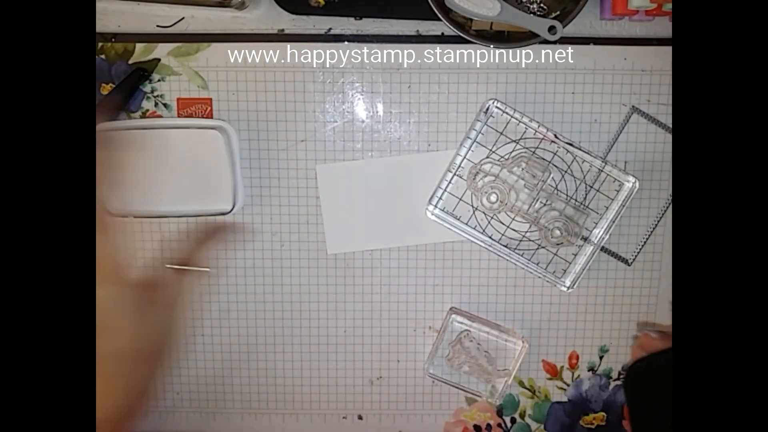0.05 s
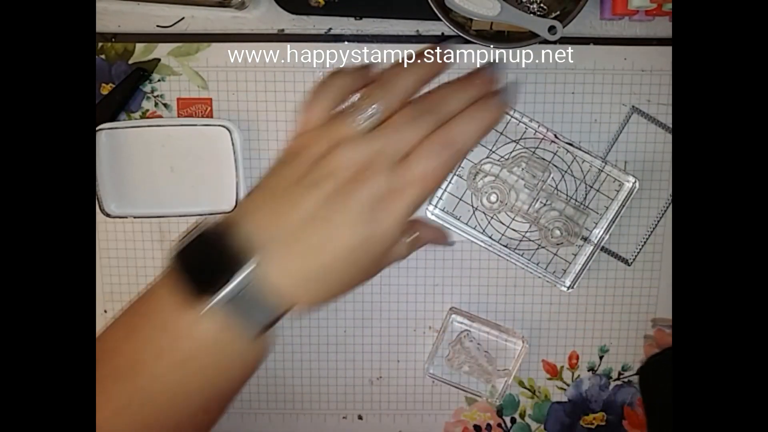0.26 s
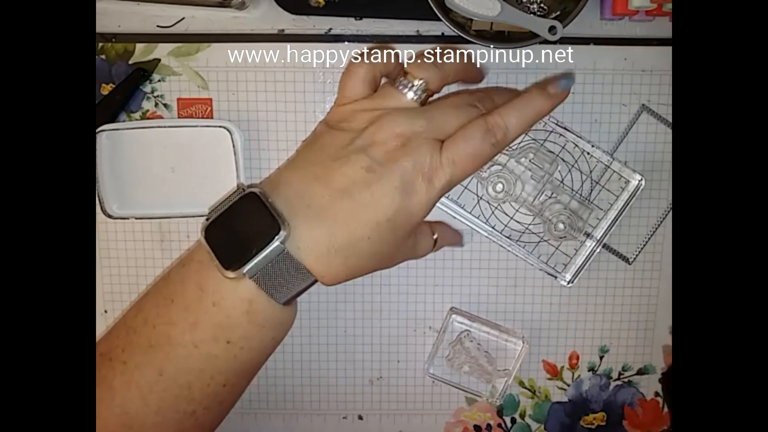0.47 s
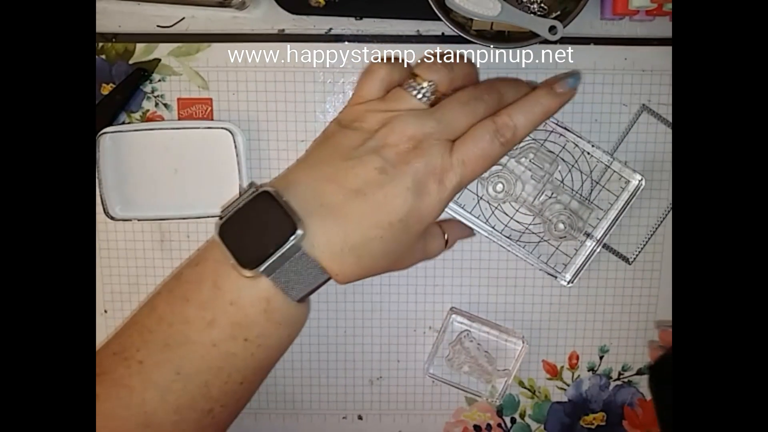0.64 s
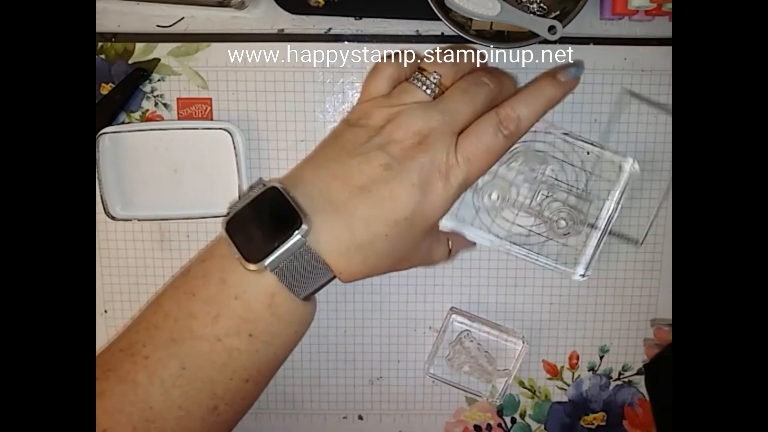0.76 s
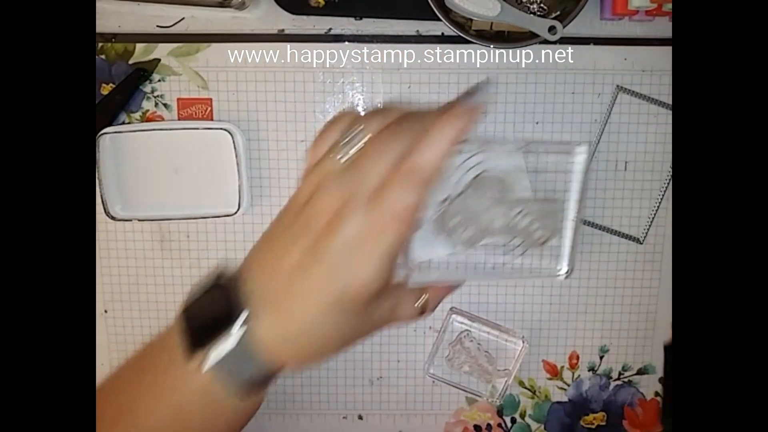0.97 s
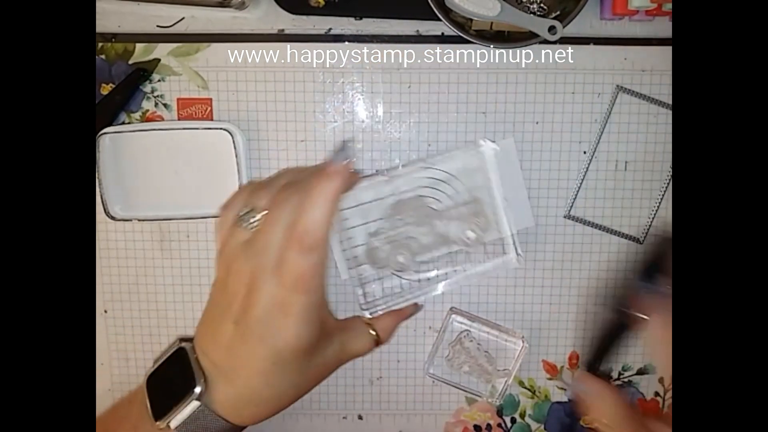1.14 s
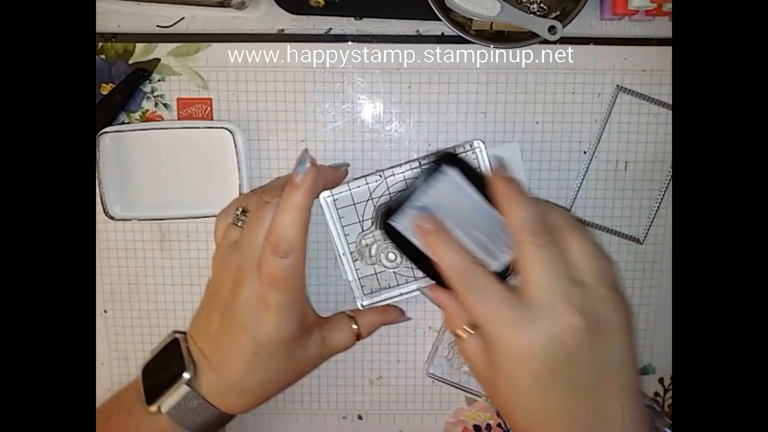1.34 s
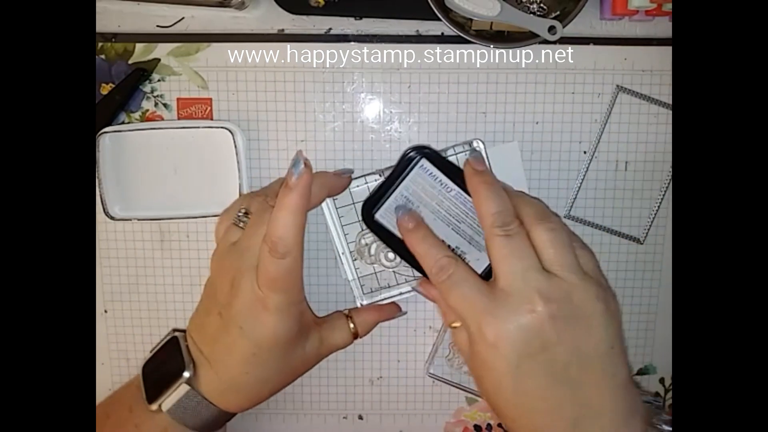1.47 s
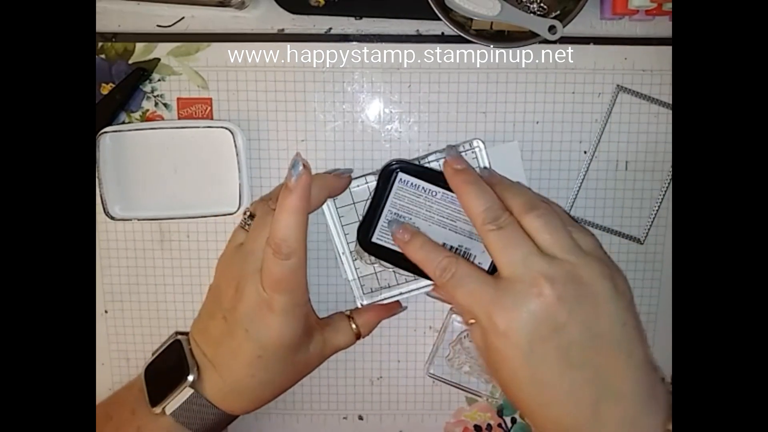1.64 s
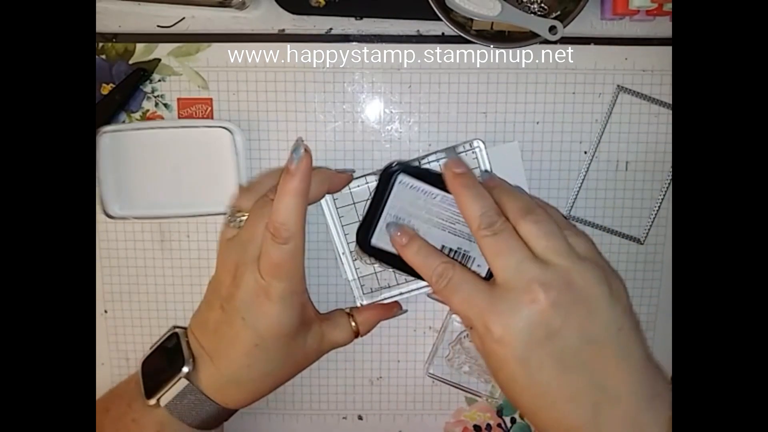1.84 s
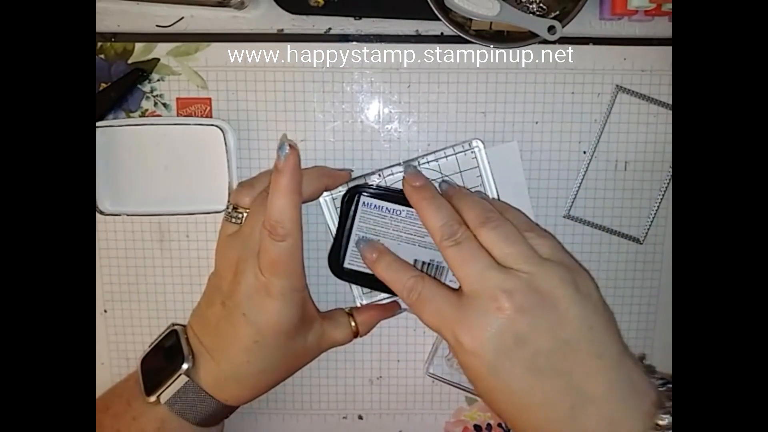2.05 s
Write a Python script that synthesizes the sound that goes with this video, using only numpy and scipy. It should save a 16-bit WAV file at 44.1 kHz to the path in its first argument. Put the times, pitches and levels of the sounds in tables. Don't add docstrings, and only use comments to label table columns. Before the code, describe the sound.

A hollow plastic ink pad case rattles sharply, a finger ring clinks on acrylic, a block peels stickily and thuds onto the table, then tiny tacky dabs; small room, close overhead phone microphone.

```python
import sys
import numpy as np
from scipy import signal
from scipy.io import wavfile
from scipy.ndimage import uniform_filter1d

SR = 44100
rng = np.random.default_rng(int(sys.argv[2]) if len(sys.argv) > 2 else 0)


def persist_wave(psi):
    counts = np.round(np.clip(psi, -1, 1) * 32767).astype(np.int16)
    wavfile.write(sys.argv[1], SR, np.atleast_2d(counts).T)


def attenuation_scalar(level_db):
    decades = np.asarray(level_db, float) / 20
    return 10 ** decades


N = 92610


def rms_one(x):
    return x / np.sqrt(np.mean(x ** 2) + 1e-20)


def at_hz(points, hz):
    table_hz, values = np.transpose(points)
    return np.interp(np.log(hz), np.log(table_hz), values)


def drift(rate_hz):
    steps = rng.standard_normal(200)
    return np.interp(np.arange(N) / SR * rate_hz, np.arange(len(steps)), steps)


def lowpass(x, order, hz):
    return signal.sosfilt(signal.butter(order, hz, fs=SR, output="sos"), x)


def highpass(x, order, hz):
    return signal.sosfilt(signal.butter(order, hz, "high", fs=SR, output="sos"), x)


def resonate(x, hz, width_hz):
    r = np.exp(-np.pi * width_hz / SR)
    top = np.array([1, 0, -1]) * (1 - r * r) / 2
    return signal.lfilter(top, [1, -2 * r * np.cos(2 * np.pi * hz / SR), r * r], x + 1e-18)


def clicks(s, db):
    out = np.zeros(N) + 1e-18
    out[(np.array(s) * SR).astype(int)] = attenuation_scalar(db)
    return out


def fade(x, decay_s):
    return signal.lfilter([1], [1, -np.exp(-1 / (decay_s * SR))], x)


def puffs(s, db, decay_s):
    return fade(clicks(s, db), decay_s) * rng.standard_normal(N)


def strike(s, db, modes, contact_s, damp=1, turn=1):
    out = np.zeros(N)
    chance_db = 2.5 * rng.standard_normal((len(s), len(modes)))
    if contact_s:
        chatter = rng.standard_normal(N) / np.sqrt(contact_s * SR / 2 + 1)
    for k, (hz, level_db, t60) in enumerate(modes):
        push = clicks(s, db + level_db + chance_db[:, k])
        if contact_s:
            push = push + chatter * fade(push, contact_s)
        r, w = attenuation_scalar(-60 / (t60 * damp * SR)), 2 * np.pi * hz / SR
        out += turn ** k * signal.lfilter([0, np.sin(w)], [1, -2 * r * np.cos(w), r * r], push)
    return out


# (time [s], peak level [dB], hollow knock against the click [dB])
CASE_HITS = [(.008, -43.5, 7), (0.0555, -37.5, -2), (0.0603, -43.5, -4), (0.0711, -50, -3),
             (0.0867, -27.5, -5), (0.11, -41, 0.5), (0.126, -43, -9.5), (.1388, -9, -28),
             (.1396, -8.5, -28.5), (0.1454, -16.5, -4.5), (0.1466, -9.5, -11.5), (.149, -16.5, -17.5),
             (0.1512, -23.5, -16.5), (0.155, -24, -15), (0.158, -19, -19), (0.1603, -21, -19),
             (0.173, -33, -14.5), (.181, -27.5, -12.5), (.189, -29, -15), (0.197, -33.5, -7),
             (.213, -34, 3), (0.2349, -27, -8), (0.2534, -24, -6.5), (.2634, -22, -22), (.275, -39, -4.5),
             (0.31, -46, 3), (.328, -54, 8), (0.389, -45, -1)]
# (pitch [Hz], level [dB], time to fall 60 dB [s])
CASE_MODES = [(1775, -4.5, .012), (1980, -11, 0.011), (2369, -3, .018), (2580, -1, 0.018), (2729, 0, .022),
              (3010, -3.5, 0.02), (3860, 3, 0.014), (3998, -2, 0.017), (4650, -3.5, 0.015),
              (5020, -4, 0.013), (5310, -1, 0.0068), (6400, -14.5, 0.0058), (10860, -22.5, .008),
              (14000, -27, .003)]
# (pitch [Hz], level [dB], time to fall 60 dB [s])
KNOCK_MODES = [(321, -12, 0.011), (515, 1, .022), (946, 1.5, 0.011), (1285, -7, 0.0098)]


def case():
    s, db, knock_db = np.transpose(CASE_HITS)
    crack = resonate(puffs(s, db - 6, decay_s=.0025), hz=3600, width_hz=3500)
    crack = lowpass(crack, order=4, hz=6300)
    shell = strike(s, db - 13, CASE_MODES, contact_s=0.0004, turn=-1.011)
    knock = strike(s, db + knock_db - 9, KNOCK_MODES, contact_s=0.0037)
    return highpass(shell + crack + knock, order=2, hz=280)


# (time [s], level [dB])
SETDOWN = [
    (1.2595, -16.5),
    (1.2756, -35.5),
]
# (pitch [Hz], level [dB], time to fall 60 dB [s])
BLOCK_MODES = [(348, -4.5, 0.013), (593, -3.5, 0.021), (875, -11, 0.019), (1120, -4, .01), (1370, 1, 0.012),
               (1770, -4, 0.017), (2640, -11, 0.0073), (2970, -8.5, 0.011), (5240, -11.5, 0.013)]
# (pitch [Hz], level [dB], time to fall 60 dB [s])
TABLE_MODES = [(95.4, -27.5, 0.22), (128.5, -23.5, 0.39), (186.2, -12.5, 0.3), (230.1, 1, 0.15),
               (344.3, 3, 0.062), (427, -15.5, 0.086), (509, -9.5, 0.044)]


def setdown():
    s, db = np.transpose(SETDOWN)
    crack = resonate(puffs(s, db - 8.5, decay_s=.005), hz=3200, width_hz=3500)
    crack = lowpass(resonate(crack, hz=3800, width_hz=5500), order=3, hz=6400)
    boom = strike(s - .0002, db - 8.5, TABLE_MODES, contact_s=0)
    boom = signal.sosfilt(signal.butter(2, [100, 900], "band", fs=SR, output="sos"), boom)
    clack = lowpass(strike(s, db - 4.5, BLOCK_MODES, contact_s=0), order=3, hz=4500)
    return clack + crack + boom


# (time [s], peak level [dB])
CLINKS = [
    (0.4386, -25.5),
    (0.5657, -48.5),
]
# (pitch [Hz], level [dB], time to fall 60 dB [s])
RING_MODES = [(8600, -24, 0.15), (8540, -26, 0.099), (9150, -11.5, 0.063), (9730, -10, 0.042),
              (10320, 0.5, 0.056), (10270, -6, 0.046), (10520, -17, 0.055), (12380, -12, .06),
              (12700, -14, .06), (14430, -10.5, 0.082), (15220, -17, .1), (15400, -17, 0.11)]
# (pitch [Hz], level [dB], time to fall 60 dB [s])
ACRYLIC_MODES = [(1400, -2, 0.0045), (1840, 0, 0.019), (3280, -7, 0.0099), (4060, -5.5, 0.011),
                 (4690, -0.5, 0.0066), (5060, 0, 0.0048), (6220, -16.5, 0.016)]


def clink():
    s, db = np.transpose(CLINKS)
    crack = resonate(puffs(s, db - 3.5, decay_s=0.0028), hz=4200, width_hz=4200)
    metal = strike(s, db - 13, RING_MODES, contact_s=0.00012)
    acrylic = strike(s[:1], db[:1] - 5, ACRYLIC_MODES, contact_s=0.00058, turn=-1.09)
    return highpass(metal + acrylic + crack, order=2, hz=1300)


# (start [s], rise [s], hold [s], level [dB], deep part against the bright [dB])
PEELS = [(.868, .003, 0.0056, -56, 0), (.879, .001, 0.0034, -48.5, -8), (.885, 0.0025, 0.0041, -46.5, -12),
         (.891, .001, 0.0026, -49.5, -6), (0.897, 0.0028, .004, -40.5, 3), (.907, 0.0011, 0.0021, -43, 4),
         (0.91, 0.00075, 0.0028, -45.5, -2), (0.913, 0.00091, 0.0012, -44.5, 6),
         (0.9174, 0.00058, 0.0014, -41, 1), (.921, .001, 0.0035, -42, 1), (0.926, .002, 0.0084, -55.5, 3),
         (0.94, .002, 0.0052, -62, -4), (1.016, 0.0016, .002, -55, 2.5),
         (1.025, 0.0026, 0.0038, -54.5, -0.5)]
# (pitch [Hz], width [Hz], level [dB])
EDGE = [(336, 180, -14), (1160, 270, -23), (3230, 540, -3.5), (3510, 550, -4.5), (4320, 690, 6),
        (4900, 480, 4.5), (5630, 780, -1), (6660, 480, -16)]


def peel():
    slips_per_s, rough_db, fall_s = 5000, 3.0, .0015
    t = np.arange(N) / SR
    start, rise, hold, db, deep_db = np.array(PEELS).T[:, :, None]
    swell = np.clip((t - start) / rise, 0, 1)
    shape = swell * np.exp(-np.maximum(t - start - rise - hold, 0) / fall_s)
    strength = attenuation_scalar(rough_db * np.minimum(rng.exponential(1, N), 4))
    slips = (rng.random(N) < slips_per_s / SR) * strength * rng.choice([-1, 1], N)
    rings = []
    for k, (hz, width_hz, level_db) in enumerate(EDGE):
        ringing = resonate(resonate(slips, hz, width_hz), hz, 2 * width_hz)
        rings.append(attenuation_scalar(level_db) * (-1) ** k * ringing)
    deep, bright = rms_one(sum(rings[:4])), rms_one(sum(rings[4:]))
    bright = bright + attenuation_scalar(-21.5) * rng.standard_normal(N)
    bright_level = np.sum(attenuation_scalar(db) * shape, axis=0)
    deep_level = np.sum(attenuation_scalar(db + deep_db - 4) * shape, axis=0)
    return bright_level * bright + deep_level * deep


# (time [s], peak level [dB], pitch [Hz], length [s])
TICKS = [(0.6774, -48.5, 5130, 0.00095), (0.8271, -44, 5670, 0.0014), (.828, -50, 950, .003),
         (0.869, -50, 1400, 0.0043), (1.135, -59, 3300, 0.0055), (1.2366, -36.5, 3780, 0.0036),
         (1.2563, -48, 9000, .0008), (1.2588, -45.5, 8900, .0015), (1.4144, -53, 2280, 0.0044),
         (1.416, -52, 4110, 0.0045), (1.578, -56, 3560, 0.0056), (1.731, -49, 3600, 0.0025),
         (1.7842, -42.5, 5060, 0.0019), (1.8896, -40, 5420, 0.0019), (1.896, -43.5, 5950, 0.0021),
         (2.0219, -36.5, 5200, 0.0013), (2.028, -54.5, 4900, 0.0027)]


def ticks():
    out, t = np.zeros(N + SR), np.arange(SR // 20) / SR
    for s, db, hz, length in TICKS:
        noise = rng.standard_normal(len(t))
        pitched = rms_one(resonate(resonate(noise, hz, hz / 2.5), hz, hz))
        snap = pitched + attenuation_scalar(-6.5) * noise
        start = int(s * SR)
        out[start:start + len(t)] += attenuation_scalar(db - 5.5) * snap * np.exp(-t / max(length, 3e-4))
    return out[:N]


# (time [s],
# length [s], pitch [Hz], level [dB])
SQUEAKS = [
    (.474, .008, 1850, -55.5),
    (.479, .01, 4000, -49.5),
    (.564, 0.01, 1860, -55),
    (.565, .007, 3510, -55),
    (0.562, 0.0083, 5900, -53.5),
    (1.012, 0.0064, 4460, -45),
    (1.02, 0.0046, 3480, -48),
    (1.026, 0.013, 3570, -50),
    (1.027, 0.0086, 4460, -55),
    (1.411, 0.012, 2380, -52.5),
]


def squeaks():
    t, out = np.arange(N) / SR, np.zeros(N)
    warped_t = np.cumsum(1 + 0.0086 * drift(rate_hz=79)) / SR
    for s, length, hz, db in SQUEAKS:
        progress = np.clip((t - s) / length, 0, 1)
        swell = np.sin(np.pi * np.sqrt(progress)) ** 2
        out = out + attenuation_scalar(db) * swell * np.sin(2 * np.pi * hz * warped_t)
    return out


# (time [s], peak level [dB])
THUMPS = [(0.189, -47), (0.239, -35), (0.438, -44.5), (0.48, -41.5), (0.562, -40.5), (0.599, -50),
          (.775, -49.5), (0.826, -47), (0.871, -41.5), (0.904, -43.5), (0.941, -42), (1.011, -50),
          (1.057, -52), (1.131, -46.5), (1.411, -44.5), (1.569, -36.5), (1.58, -36.5), (1.892, -46),
          (1.954, -44.5), (2.022, -59)]


def thumps():
    s, db = np.transpose(THUMPS)
    return lowpass(strike(s, db - 7.5, TABLE_MODES, contact_s=0, damp=0.37), order=2, hz=229)


# (time [s], level [dB])
BRUSH = [(0, -100), (1.499, -80.5), (1.57, -78), (1.599, -80), (1.66, -70.5), (1.72, -77.5), (1.82, -76),
         (1.869, -81.5), (1.959, -74.5), (2.05, -77.5), (2.1, -85)]


def brush():
    s, db = np.transpose(BRUSH)
    noise = rng.standard_normal(N)
    crisp = resonate(resonate(noise, hz=4300, width_hz=2500), hz=4300, width_hz=4000)
    rustle = crisp + .7 * resonate(noise, hz=1700, width_hz=600)
    level_db = np.interp(np.arange(N) / SR, s, db) + 2.0 * drift(rate_hz=76)
    return attenuation_scalar(level_db) * rms_one(rustle)


# (pitch [Hz], level [dB], time to fall 60 dB [s])
DISH_MODES = [(216, -48, 0.51), (423, -51.5, 0.9), (899, -60, 0.13), (1555, -43, 0.14), (1555, -54.5, 0.63),
              (1630, -53, 0.26), (4770, -47, 0.41), (11500, -69, 0.27)]


def dish():
    t, out = np.arange(N) / SR, np.zeros(N)
    for hz, db, t60 in DISH_MODES:
        wavering = rms_one(resonate(rng.standard_normal(N), hz, width_hz=110))
        out += attenuation_scalar(db - 60 * t / t60) * wavering
    wash = rms_one(resonate(rng.standard_normal(N), hz=1890, width_hz=2100))
    return out + attenuation_scalar(-53 - 60 * t / .5) * wash


def bands(size):
    edges, white = 35 * 2 ** np.arange(0, 9.1, .5), rng.standard_normal((2, size))
    out = []
    for k, (low, high) in enumerate(zip(edges, edges[1:])):
        band = signal.butter(2, [low, high], "band", fs=SR, output="sos")
        out.append((np.sqrt(low * high), signal.sosfilt(band, white[k % 2])))
    return out


# (pitch [Hz], time to fall 60 dB [s])
ROOM_T60 = [(150, 0.34), (500, 0.3), (2000, 0.22), (5000, .33), (12000, 0.6)]
# (pitch [Hz], level [dB])
ROOM_COLOUR = [(150, 1.5), (1000, 3), (4000, 0.5), (7000, -2), (15000, -12)]


def room(x):
    gap_s, t = 0.0065, np.arange(SR // 2) / SR
    tail = np.zeros(len(t))
    for hz, noise in bands(size=len(t)):
        tail += attenuation_scalar(at_hz(ROOM_COLOUR, hz) - 60 * t / at_hz(ROOM_T60, hz)) * noise
    tail = tail * np.clip(t / gap_s - .5, 0, 1) / np.sqrt(SR / 40)
    return signal.fftconvolve(x, tail)[:N]


# (pitch [Hz], level [dB per Hz])
TONE = [(45, -10.5), (120, 1.5), (300, -7.5), (900, -19.5), (2500, -22.5), (5000, -29.5), (7500, -33),
        (15500, -33.5)]


def room_tone(sounds):
    close_ramp_db = 92.5 * np.arange(N) / SR
    level_db = 10 * np.log10(uniform_filter1d(sounds ** 2, size=512) + 1e-12)
    open_db = np.clip(0.31 * (level_db + 66.5), 0, 15)
    open_db = np.maximum.accumulate(open_db + close_ramp_db) - close_ramp_db
    air = np.zeros(N)
    for hz, noise in bands(size=N):
        air += attenuation_scalar(at_hz(TONE, hz) - 3 * drift(rate_hz=14)) * noise
    hum = attenuation_scalar(-4) * rms_one(resonate(rng.standard_normal(N), hz=128, width_hz=25))
    return attenuation_scalar(-65.5) * (attenuation_scalar(open_db) * rms_one(air) + hum)


# (time [s], level [dB], held [s])
GATES = [
    (.3, -6, 0.14),
    (.505, -4, 0.048),
    (1.386, -24, 0.17),
]


def suppressor_gate():
    t, gate_db = np.arange(N) / SR, np.zeros(N)
    for s, db, held in GATES:
        gate_db += db * np.clip((t - s) / 0.0054, 0, 1) * (t < s + held)
    return attenuation_scalar(gate_db)


def scene():
    hits = [(case(), -11.5), (clink(), -8.5), (setdown(), -7)]
    small = [(ticks(), -13), (peel(), -16.5), (squeaks(), -15)]
    gate = suppressor_gate()
    wet = gate * room(sum(attenuation_scalar(db) * x for x, db in hits + small))
    soft = dish() + thumps() + brush() + sum(x for x, db in small)
    hard = sum(x for x, db in hits)
    steady = soft + wet + room_tone(soft + hard + wet)
    treble_cut = signal.cheby2(10, 40, 16000, fs=SR, output="sos")
    return (gate * hard + signal.sosfilt(treble_cut, steady))[None]


def low_pass(x):
    return signal.sosfilt(signal.butter(12, 16520, fs=SR, output="sos"), x)


def record(dry):
    mix = highpass(dry, order=3, hz=83) - 0.00052 + attenuation_scalar(-86) * drift(rate_hz=110)
    return low_pass(mix)


dry = scene()
out = record(dry)
persist_wave(out)
```